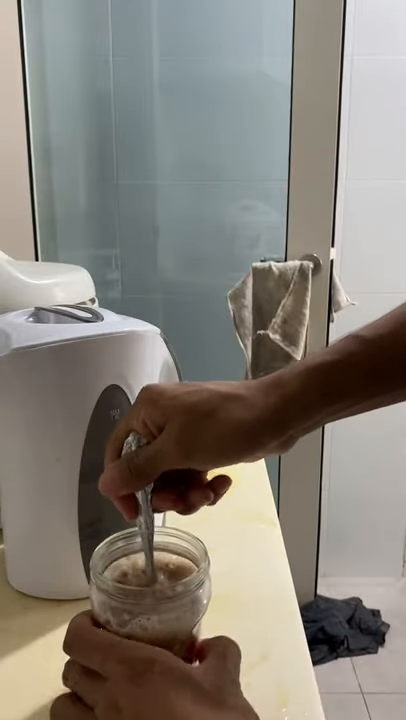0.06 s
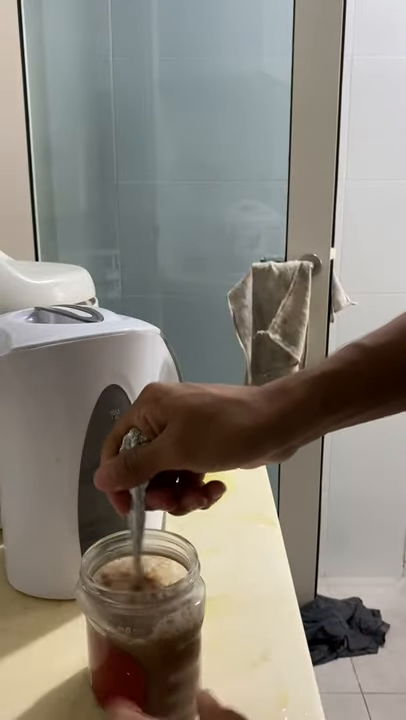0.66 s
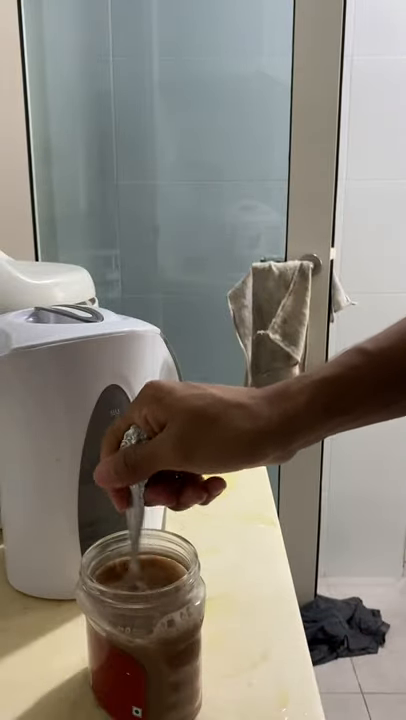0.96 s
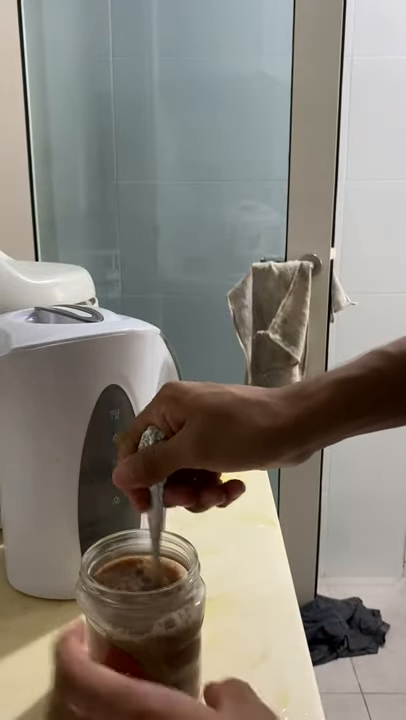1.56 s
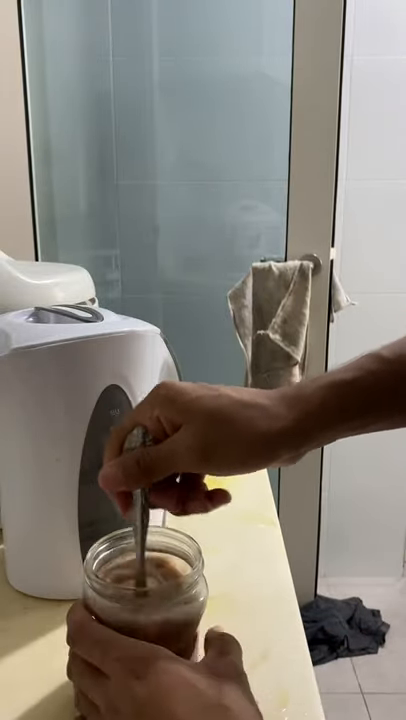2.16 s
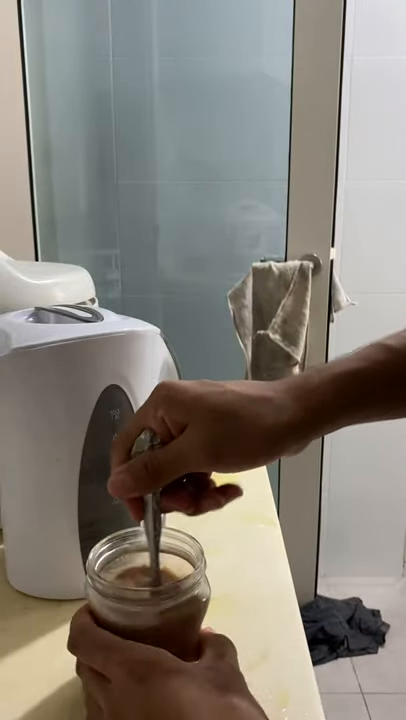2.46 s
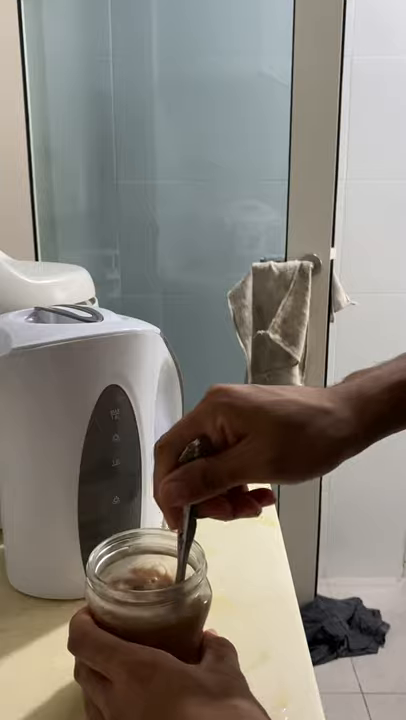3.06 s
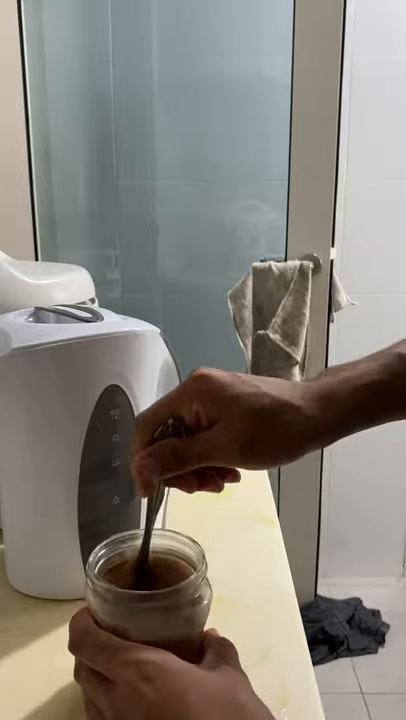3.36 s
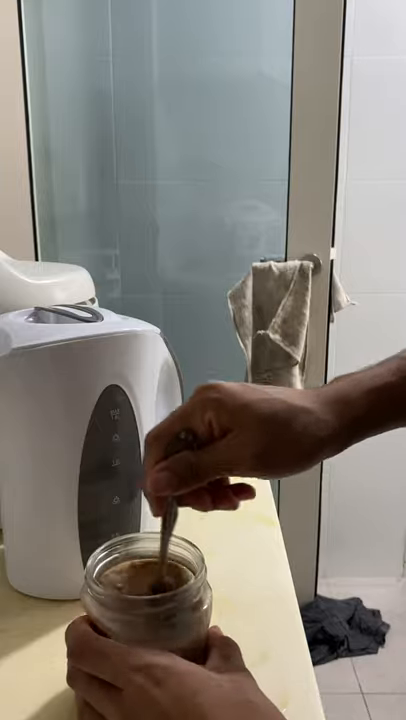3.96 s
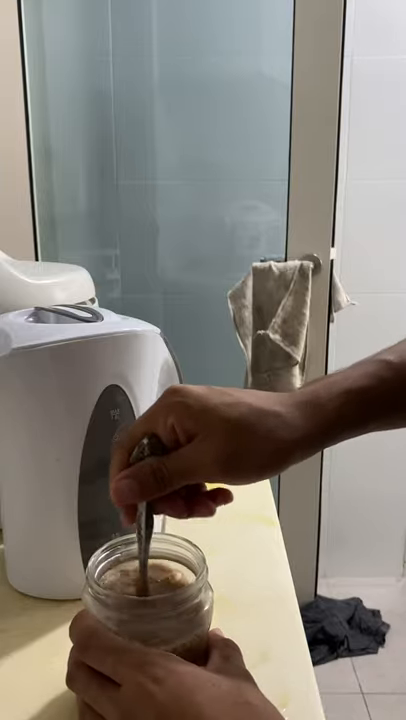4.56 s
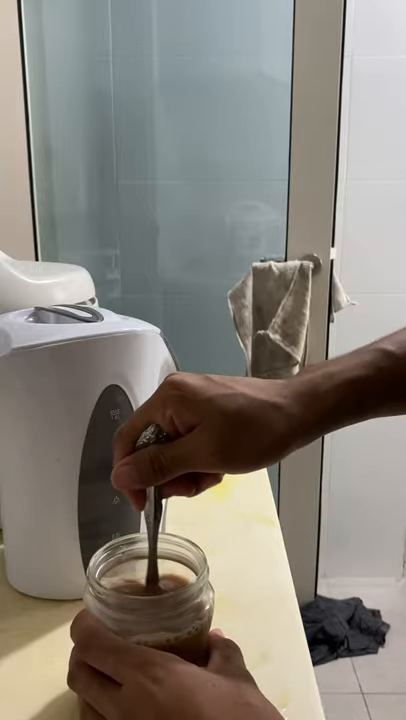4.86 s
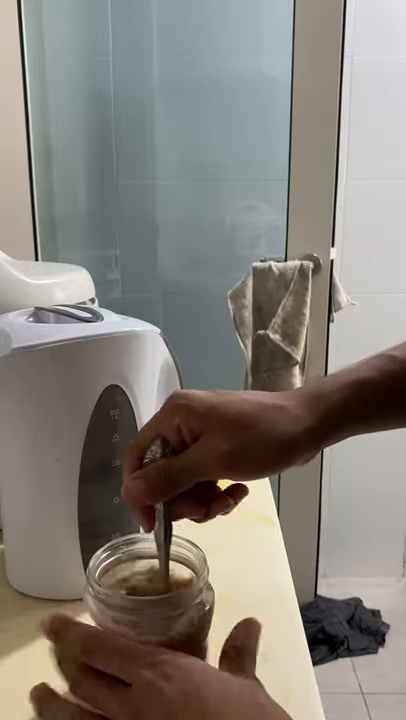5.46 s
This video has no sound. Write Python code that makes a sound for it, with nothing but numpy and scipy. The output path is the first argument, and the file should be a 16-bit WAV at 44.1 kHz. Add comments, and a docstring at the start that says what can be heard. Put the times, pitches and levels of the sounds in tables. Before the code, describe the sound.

A steel spoon stirs a thick drink in a glass jar, close by, for about five and a half seconds. From the start it clinks against the glass several times a second, unevenly, each hit bright and quickly damped. Duller knocks with small wet plops fall among the clinks, and the liquid swishes softly with a few tiny bubbles. The jar rubs faintly on the counter in the first 0.3 seconds and again near 1.9, with light low thumps mostly between 1 and 2.5 seconds. The loudest clinks come from 2 to 2.5 seconds. After that the hits are somewhat lighter and sparser. From about 4.2 to 4.8 seconds the spoon drags over the bottom with a faint hollow tone, and sharper clinks stand out near 4.5 and 5 seconds. A small tiled kitchen gives a short echo, with a low steady hum underneath.

```python
"""Stirring a thick drink in a jar

A steel spoon stirs inside a glass jar that a hand steadies on a kitchen counter. Each knock thuds
into the counter, sounds the air in the jar and briefly rings the damped glass and the spoon.
Deep knocks plop, and the drink swishes softly in between; a small tiled room answers, over a low hum."""
import sys
import numpy as np
from scipy import signal
from scipy.fft import rfft, irfft
from scipy.io import wavfile
from scipy.ndimage import uniform_filter1d

SR = 44100
rng = np.random.default_rng(int(sys.argv[2]) if len(sys.argv) > 2 else 0)


def unload_audio(sound):
    """Save the sound as a 16-bit wav file, at the path given as the first command line argument."""
    columns = np.transpose(np.atleast_2d(sound))
    # keep every value between -1 and 1, then stretch to whole-number steps
    steps = np.round(np.clip(columns, -1, 1) * 32767)
    wavfile.write(sys.argv[1], SR, steps.astype(np.int16))


N = 243431
TIME = np.arange(N) / SR
RING = np.arange(SR * 3 // 10) / SR  # time axis of one hit, t/s


def amp(db):
    """Decibels to gain."""
    return 10 ** (np.asarray(db) / 20)


def unit_rms(x):
    """Normalises to rms 1."""
    return x / np.sqrt(np.mean(x ** 2) + 1e-20)


def unit_attack(x):
    """Normalises to rms 1 over the attack."""
    return x / np.sqrt(np.mean(x[:SR // 54] ** 2) + 1e-20)


def curve_at(points, hz):
    """Reads a curve on a log frequency axis."""
    f, value = np.transpose(points)
    return np.interp(np.log(hz + 1), np.log(f + 1), value)


def eq(x, points):
    """Shapes x with a curve of f/Hz, level/dB."""
    hz = np.fft.rfftfreq(x.shape[-1], 1 / SR)
    return irfft(rfft(x) * amp(curve_at(points, hz)), x.shape[-1])


def add(mix, s, sound):
    """Mixes a sound in at s seconds."""
    part = mix[max(round(s * SR), 0):][:len(sound)]
    part += sound[:len(part)]


def decay(t60):
    """Falls 60 dB in t60 seconds."""
    return np.exp(-np.log(1000) * RING / max(t60, 1e-3))


def rise(seconds):
    """Softens an onset."""
    return 1 - np.exp(-RING / seconds)


def modal(modes, spot_db=1.5, detune=0.013):
    """A struck part: the contact spot sets each mode's strength; the sloshing drink detunes it."""
    sound = np.zeros(len(RING))
    for (hz, db, t60), (spot, shift, side) in zip(modes, rng.standard_normal((len(modes), 3))):
        tone = np.sin(2 * np.pi * hz * (1 + detune * shift) * RING)
        sound += np.sign(side) * amp(db + spot_db * spot) * decay(t60) * tone
    return unit_attack(sound)


# Low modes of the thud, a room boom near 120 Hz and the woody counter: f/Hz, level/dB, t60/s
THUD_MODES = [(122, -9.5, 0.2), (173, -14, 0.099), (247, -16, 0.11), (331.6, -4.5, 0.19),
              (396, -12.5, 0.022)]
# Judders of the jar's foot: t/s, length/s, level/dB, slip rate/Hz, unevenness
JUDDERS = [(0.0, 0.19, -54.5, 205, 0.3), (0.159, 0.12, -53, 207, 0.36), (0.289, 0.043, -47.5, 210, 0.54),
           (1.897, 0.083, -42.5, 335, 0.02)]
def judders(low_cut_hz=170):
    """The glass foot sticks and slips; every slip thumps the counter, damped by the pressing hand."""
    out = np.zeros(N)
    low_cut = signal.butter(2, low_cut_hz, "high", fs=SR, output="sos")
    for s, length, db, rate_hz, uneven in JUDDERS:
        n = round(length * SR)
        wander = unit_rms(uniform_filter1d(rng.standard_normal(n), size=200))
        slip_count = np.floor(np.cumsum(rate_hz * np.exp(uneven * wander)) / SR)
        slips = np.diff(slip_count, prepend=0)
        rub = signal.fftconvolve(slips, modal(THUD_MODES) * decay(0.012))[:n]
        fade = signal.windows.tukey(n, .3) * np.linspace(1, .4, n)
        add(out, s, amp(db) * unit_rms(signal.sosfilt(low_cut, rub) * fade))
    return out


# Fader ride of the swish, before its trim: t/s, level/dB
SWIRL_RIDE = [(0, -41.5), (.3, -61), (0.801, -58.5), (0.999, -57), (1.2, -65.5), (1.601, -59), (2.2, -58.5),
              (2.65, -61.5), (3.5, -72), (3.65, -59.5), (3.85, -69.5), (4.2, -65.5), (4.95, -67.5),
              (5.2, -58.5), (5.52, -70)]
# Its hollow tone: f/Hz, level/dB
SWIRL_EQ = [(250, -25), (480, -6.5), (590, 0), (660, -13.5), (730, 2.5), (830, -29), (1000, -16.5),
            (1500, -18.5), (3200, -16.5), (6500, -27.5), (9000, -76)]
def swirl(trim_db=-2, lumpy_db=3):
    """The drink swishes round in uneven lumps, coloured by the air in the jar."""
    lumps = unit_rms(eq(rng.standard_normal(N), [(1, 0), (30, 0), (90, -60), (200, -120)]))
    swish = unit_rms(eq(rng.standard_normal(N) * amp(lumpy_db * lumps), SWIRL_EQ))
    return swish * amp(np.interp(TIME, *np.transpose(SWIRL_RIDE)) + trim_db)


# Stereo image of the room: f/Hz, left-right correlation
ROOM_IMAGE = [(60, 1), (130, 0.98), (300, 0.94), (2000, 0.88), (3600, 0.2), (5000, 0.45), (7000, 0.8),
              (8200, 0.97), (10000, 0.99), (11500, 0.97), (13000, 0.85), (14500, 0.5)]
def room_noise(n):
    """Stereo noise, partly alike in left and right."""
    left, other = rng.standard_normal((2, n))
    same = curve_at(ROOM_IMAGE, np.fft.rfftfreq(n, 1 / SR))
    right = irfft(same * rfft(left) + np.sqrt(1 - same ** 2) * rfft(other), n)
    return np.array([left, right])


# Room tone: f/Hz, relative level/dB
HUM_EQ = [(12, -28.5), (25, -11), (49, -2.5), (68, 7), (111, -6), (180, -9), (330, -13), (480, -14),
          (656, -8.5), (850, -23.5), (1400, -21.5), (3200, -40.5), (6500, -46), (8500, -53), (13000, -51),
          (15000, -58)]
def hum(level_db=-56.5):
    """The low, steady background of the kitchen."""
    return amp(level_db) * unit_rms(eq(room_noise(N), HUM_EQ))


def ring(modes, clatter, rise_s, linger=1, note_hz=0, share=0, note_t60=.05):
    """One part's modes and dense clatter, with a share of the energy in the note the blow favours."""
    low_hz, high_hz, clatter_db, clatter_t60 = clatter
    band = signal.butter(5, [low_hz, high_hz], "band", fs=SR, output="sos")
    dense = signal.sosfilt(band, rng.standard_normal(len(RING)) * decay(clatter_t60 * linger))
    note = unit_attack(np.sin(2 * np.pi * note_hz * RING) * decay(note_t60))
    body = modal(modes) + amp(clatter_db) * unit_attack(dense)
    body = unit_attack(body - note * (body @ note) / (note @ note + 1e-20))  # make room for the note
    share = np.clip(share, 0, 1)
    return unit_attack((np.sqrt(1 - share) * body + np.sqrt(share) * note) * rise(rise_s))


# Modes of the jar's air, glass wall, spoon, spoon edge and a very high ting: f/Hz, level/dB, t60/s
AIR_MODES = [(579.6, -2.5, 0.044), (688, 2, 0.025), (736.5, -5, 0.056)]
WALL_MODES = [(1158, 1.5, 0.04), (1284, -2.5, 0.066), (1439, 0.5, 0.063), (1490, 0.5, 0.06),
              (1580, 0, 0.035), (1681, 0.5, 0.029), (1846, -0.5, 0.029), (2044, 8.5, 0.023),
              (2210, 3.5, 0.023), (2330, 0, 0.027)]
SPOON_MODES = [(2920, -1.6, 0.048), (3060, -2, 0.04), (3245, -0.65, 0.055), (3412, 0.8, 0.037),
               (3713, -1, 0.03), (3865, -0.77, 0.03)]
EDGE_MODES = [(4810, 2.5, 0.033), (5216, 0.5, 0.026), (5507, 3, 0.023), (5677, -0.5, 0.04),
              (6370, -5, 0.02), (7120, -8, 0.022)]
TING_MODES = [(11500, 6.5, 0.02), (13400, -2, .025), (13500, 1, .025), (14900, -4, .018)]
# Noisy clatter beside the modes: low f/Hz, high f/Hz, level/dB against the modes, base t60/s
THUD_CLATTER = (241, 503, -3, 0.1261)
AIR_CLATTER = (478.5, 773, -7.5, 0.0643)
WALL_CLATTER = (1206, 2395, 1.5, 0.1055)
SPOON_CLATTER = (2403.5, 4301.5, 2, 0.0779)
EDGE_CLATTER = (4720, 7800, 0.8, 0.021)
TING_CLATTER = (11500, 15000, 7, .012)
# The crisp tick of bare steel on glass: f/Hz, level/dB
TICK_EQ = [(4000, -26), (6500, -6), (8000, 3), (9600, 5), (11000, 2), (12500, -2), (14000, -7),
           (15300, -11), (16300, -34)]
def knock(levels_db, tick_db, wall_hz, wall_share, spoon_share, linger, spoon_hz=3124, edge_hz=3300):
    """A knock sounds thud, air, wall, spoon and edge at once, each as hard as the blow reaches it."""
    wall_t60 = 0.034 * (1490 / wall_hz) ** 1.8  # higher notes die sooner
    thud = ring(THUD_MODES, THUD_CLATTER, rise_s=0.0011)
    air = ring(AIR_MODES, AIR_CLATTER, rise_s=0.00091)
    wall = ring(WALL_MODES, WALL_CLATTER, 0.00059, linger, wall_hz, wall_share, wall_t60)
    spoon = ring(SPOON_MODES, SPOON_CLATTER, 0.0017, linger, spoon_hz, spoon_share, note_t60=0.013)
    edge = ring(EDGE_MODES, EDGE_CLATTER, 0.00027, linger, edge_hz, share=0.38, note_t60=0.0074)
    crack = unit_attack(eq(rng.standard_normal(len(RING)) * decay(.007), TICK_EQ) * decay(.3))
    ting = ring(TING_MODES, TING_CLATTER, rise_s=0.00016)
    trims_db = np.array([-1, 0, 1.26, -0.24, -1])
    body = amp(levels_db + trims_db) @ np.array([thud, air, wall, spoon, edge])
    return body + amp(tick_db - 3.5) * crack + amp(tick_db - 10) * ting


# Bright hits, before trims: t/s, wall level/dB; thud, spoon, edge level/dB against the wall;
# tick level/dB; wall, spoon, edge note f/Hz; wall note share, spoon note weight
CLINKS = [(0.002, -45.5, -10, 4, 7, -50, 2290, 3120, 5580, 0.95, 0.13),
          (0.0682, -32, -11.5, -0.5, -5, -43.5, 1603, 3210, 5360, 0.7, 0.48),
          (0.1327, -33.5, -5, 2.5, 7, -34.5, 2225, 3250, 5700, 0.52, 0.22),
          (0.369, -55.5, 10, -5, -4.5, -63, 1665, 3730, 4660, 0.46, 0.31),
          (0.4934, -37.5, -2, 2.5, 4, -37, 1276, 3420, 5850, 0.52, 0.38),
          (0.6865, -36, -4, -1, 2.5, -31, 1434, 3020, 5590, 0.29, 0.2),
          (0.884, -40, 3, 5.5, 0, -58, 1625, 3550, 4880, 0.32, 0.42),
          (1.0358, -45.5, -6, -9, -7, -56.5, 1555, 3800, 5520, 0.71, 0.2),
          (1.1453, -59.5, -6, 1, 4, -66, 1490, 3400, 4855, 0.24, 0.33),
          (1.286, -33, -8, -7, -10, -44, 1987, 3280, 5600, 0.79, 0.2),
          (1.4037, -41, -7, -5, -0.5, -45, 1250, 3460, 5530, 0.66, 0.56),
          (1.469, -37.5, -9, -5, -8.5, -52, 2030, 3050, 5900, 0.92, 0.17),
          (1.558, -52, -11, 5, -0.5, -68, 2000, 3176, 4844, 0.44, 0.3),
          (1.5783, -33.5, -7.5, -8.5, -6, -48.5, 1552, 3450, 4700, 0.64, 0.5),
          (1.6391, -36.5, -7, 0.5, -9.5, -51, 1970, 3140, 4470, 0.27, 0.59),
          (1.782, -32.5, -11, -7, -9, -41.5, 1650, 3090, 5200, 0.48, 0.32),
          (1.9234, -50.5, 0, 1, 4, -62, 2280, 3080, 5470, 0.29, 0.45),
          (2.0029, -25, -15, -4.5, -8.5, -38.5, 1486, 3720, 5600, 0.62, 0.15),
          (2.0289, -34, -3.5, -14, -8.5, -61, 1616, 3910, 5540, 0.52, 0.17),
          (2.1462, -45.5, -12, -12, -18, -80, 1830, 3100, 5600, 0.61, 0.31),
          (2.1815, -57.5, 6, 2.5, -7, -83, 1570, 3110, 5280, 0.67, 0.78),
          (2.3065, -29, -15.5, -10.5, -10, -44.5, 1552, 3430, 4720, 0.51, 0.43),
          (2.495, -27.5, -14, -4.5, -3, -35.5, 1514, 3740, 5500, 0.72, 0.55),
          (2.7691, -53, -10, 5, -1.5, -71, 1546, 4240, 4800, 0.87, 0.51),
          (2.9652, -40, -15.5, 7, -0.5, -50.5, 2000, 4130, 4866, 0.41, 0.14),
          (2.983, -42.5, -15, 0, 3, -66, 2340, 3500, 5430, 0.95, 0.23),
          (3.2551, -56, -6, 7, -22, -63, 2060, 3030, 6790, 1, 0.78),
          (3.295, -44, -13, -11.5, -24, -83, 1617, 3060, 5810, 0.95, 0.25),
          (3.3467, -38, -15, -10.5, -12, -53, 1630, 3700, 5470, 0.63, 0.1),
          (3.3785, -38, -3.5, -8.5, -11, -55, 2040, 2480, 5630, 0.68, 0.29),
          (3.6672, -41.5, -16, 4, -1.5, -59, 2030, 3440, 4970, 0.71, 0.43),
          (3.741, -56.5, -11.5, -4.5, 0, -86, 2050, 3300, 5700, 0.22, 0.51),
          (3.925, -75, -4.5, 10, -5, -87, 2300, 3720, 4850, 0.85, 0.83),
          (3.959, -43.5, -5, -5, -19, -67, 2070, 4000, 4400, 0.32, 0.25),
          (4, -59, -7, -16, -21, -81, 2070, 2950, 4870, 0.2, 0.19),
          (4.124, -37.5, -10.5, -2, -16, -53, 1490, 3650, 5300, 0.66, 0.71),
          (4.134, -48, -13, 5.5, -12, -71, 1540, 3760, 5400, 0.13, 0.94),
          (4.347, -66.5, -14, 11.5, 2, -64, 2020, 3840, 4640, 0.26, 0.75),
          (4.4461, -56.5, -9, 8, 5.5, -70.5, 1540, 3270, 5240, 0.35, 0.34),
          (4.454, -34, -5, 3.5, 6, -37.5, 1534, 3170, 5230, 0.57, 0.6),
          (4.757, -48, -8, -3.5, -10, -61, 1644, 3650, 5440, 0.95, 0.64),
          (5.0103, -31, -6.5, 5, 4.5, -31.5, 2040, 2970, 5706, 0.77, 0.45),
          (5.081, -42, -29.5, 2.5, 3, -45.5, 2060, 2980, 5560, 0.41, 0.31),
          (5.295, -41, -16, -3, -9.5, -59, 1514, 3190, 5300, 0.76, 0.56)]
def clinks():
    """Steel on the glass wall: the contact spot picks one note each from wall, spoon and edge."""
    out = np.zeros(N)
    for s, wall, thud, spoon, edge, tick, wall_hz, spoon_hz, edge_hz, share, weight in CLINKS:
        air = -2 + 0.66 * thud  # stirred partly by the wall, partly by the thud
        levels_db = wall + np.array([thud, air, 0, spoon, edge])
        linger = 0.63 * amp(0.25 * spoon)  # a rattling spoon clatters longer
        blow = knock(levels_db, tick, wall_hz, share, 1.235 * weight, linger, spoon_hz, edge_hz)
        add(out, s - .0005, blow)
    return out


# Low thumps, before balance and trims: t/s, level/dB
THUMPS = [(.287, -39.5), (1.08, -42.5), (1.8505, -37), (1.8987, -43), (2.0946, -42), (2.1623, -45),
          (2.506, -44), (5.019, -49)]
def thumps():
    """The jar rocks and its foot thumps the counter."""
    out = np.zeros(N)
    balance_db = np.array([0.7, -3.5, -18, -34, -46.5])  # thud, air, wall, spoon, edge
    for s, db in THUMPS:
        blow = knock(db + balance_db, -np.inf, wall_hz=1434, wall_share=.5, spoon_share=.3, linger=1)
        add(out, s - .0005, blow)
    return out


def plop(pitch_hz=780, spread=0.045, sag=0.3, glide_s=0.008):
    """A pocket of air behind the spoon rings and glides up as the drink closes over it."""
    hz = pitch_hz * np.exp(spread * rng.standard_normal()) * (1 - sag * np.exp(-RING / glide_s))
    return unit_attack(np.sin(2 * np.pi * np.cumsum(hz) / SR) * decay(0.036) * rise(0.0016))


# Dull, wet hits, before balance and trims: t/s, level/dB, wall note f/Hz
HOLLOW_KNOCKS = [(.547, -48, 1260), (.7415, -39.5, 1440), (0.9374, -36.5, 1520), (1.1464, -51.5, 1474),
                 (1.34, -32.5, 1990), (1.558, -34.5, 2060), (1.782, -35.5, 1594), (2.0022, -25, 1425),
                 (2.0952, -32.5, 1900), (2.593, -34, 1283), (3.534, -32.5, 1710), (3.739, -52.5, 2120),
                 (4.4989, -40, 1596), (5.077, -38.5, 1650), (5.295, -41, 1470), (5.4417, -45.5, 1450)]
def hollow_knocks():
    """The spoon knocks deep in the drink, each time with a plop."""
    out = np.zeros(N)
    balance_db = np.array([-14.5, -9, -8, -13, -18.5])  # thud, air, wall, spoon, edge
    for s, db, wall_hz in HOLLOW_KNOCKS:
        blow = knock(db + balance_db, db - 25, wall_hz, wall_share=.4, spoon_share=.25, linger=0.33)
        add(out, s - .0005, blow + amp(db + 1.5) * plop())
    return out


# Tiny blips in the froth: t/s, level/dB, starting f/Hz
BUBBLES = [(0.661, -53.5, 1710), (0.772, -56, 1900), (1.2575, -52, 1940), (2.457, -53.5, 1570),
           (3.151, -63, 1670), (4.1035, -58, 1870), (4.8984, -70, 2000)]
def bubbles(t60=0.014, glide_per_s=1.5):
    """Each bursting bubble rings for a moment and rises in pitch as it opens."""
    out = np.zeros(N)
    for s, db, hz in BUBBLES:
        cycles = hz * (RING + glide_per_s * RING ** 2 / 2)
        add(out, s, amp(db) * unit_attack(np.sin(2 * np.pi * cycles) * decay(t60) * rise(0.0026)))
    return out


# Sparkle on top: t/s, level/dB, centre f/Hz
SIZZLES = [(.687, -43, 12050), (2.496, -60, 15200), (2.966, -62, 13800)]
def sizzles(t60=0.14, width_hz=700):
    """A narrow band of very high hiss sizzles briefly after three hits."""
    out = np.zeros(N)
    for s, db, hz in SIZZLES:
        band = signal.butter(2, [hz - width_hz / 2, hz + width_hz / 2], "band", fs=SR, output="sos")
        hiss = signal.sosfilt(band, rng.standard_normal(len(RING)))
        add(out, s, amp(db) * unit_attack(hiss * decay(t60)))
    return out


# Short, soft moans: t/s, length/s, level/dB, f/Hz
DRAGS = [(4.158, 0.17, -55.5, 683), (4.301, 0.13, -59.5, 707), (4.531, 0.17, -53, 658),
         (4.699, 0.15, -59, 657)]
def drags(width_hz=30):
    """The spoon drags over the bottom; its friction feeds one narrow resonance of the jar's air."""
    out = np.zeros(N)
    for s, length, db, hz in DRAGS:
        n = round(length * SR)
        resonance = np.sin(2 * np.pi * hz * RING) * RING * np.exp(-2 * np.pi * width_hz * RING)
        moan = signal.fftconvolve(rng.standard_normal(n + len(RING) - 1), resonance, "valid")
        add(out, s, amp(db) * unit_rms(moan * signal.windows.tukey(n, .6)))
    return out


def crossfades(rate_hz):
    """Two gains that trade places at constant power."""
    angle = 2 * np.pi * rate_hz * TIME
    return np.cos(angle), np.sin(angle)


# Stereo image of the close sound: f/Hz, left-right correlation
CLOSE_IMAGE = [(600, 1), (2200, 0.97), (3600, 0.5), (4800, 0.72), (7000, 0.92), (9500, 0.995),
               (11500, 0.96), (15000, 0.8)]
def close_scatter(x, length_s=0.0034):
    """Hands and counter scatter the direct sound differently to each side; the image slowly shifts."""
    n = round(length_s * SR)
    scattered = np.zeros(N)
    for gain in crossfades(rate_hz=1.303):
        taps = unit_rms(rng.standard_normal(len(RING))[:n]) / np.sqrt(n)
        scattered += signal.oaconvolve(x * gain, taps)[:N]
    same = curve_at(CLOSE_IMAGE, np.fft.rfftfreq(N, 1 / SR))
    mid = irfft(rfft(x) * np.sqrt((1 + same) / 2), N)
    side = irfft(rfft(scattered) * np.sqrt((1 - same) / 2), N)
    return np.array([mid + side, mid - side])


# Reverb time: f/Hz, t60/s
ROOM_T60 = [(100, 0.83), (300, 0.48), (650, 0.38), (1500, 0.35), (3500, 0.36), (6500, 0.43), (9000, 0.37),
            (14000, 0.28)]
# Reverb tone: f/Hz, level/dB
ROOM_EQ = [(100, 5.5), (300, -5), (650, -0.5), (1500, -3.5), (2200, -5), (3300, -3), (6800, -6), (9000, -6),
           (12500, -8.5), (15000, -20)]
def room_tail(predelay_s=.005, early_s=0.018):
    """Dense reflections off the tiles; the nearest surfaces answer first and loudest."""
    t = np.arange(SR * 3 // 4) / SR
    taps = room_noise(len(t)) * (1 + np.exp(-t / early_s)) / 1.5
    hz, frame_s, bands = signal.stft(taps, SR, nperseg=256)
    rate = np.log(1000) / curve_at(ROOM_T60, hz)[:, None]
    fade = np.exp(-rate * frame_s) * np.sqrt(2 * rate / SR)  # unit energy in every band
    tail = signal.istft(bands * fade * amp(curve_at(ROOM_EQ, hz))[:, None], SR, nperseg=256)[1]
    return np.pad(tail, ((0, 0), (round(predelay_s * SR), 0)))


def room(x):
    """Two room tails crossfade slowly, so the reverb's colour varies from hit to hit."""
    return sum(signal.fftconvolve((x * gain)[None], room_tail(), axes=1)[:, :N]
               for gain in crossfades(rate_hz=0.9074))


def scene(deep_send_db=-3):
    """Jar and spoon close by, the room around them; blows deep in the jar reach the room less."""
    deep = hollow_knocks() + thumps()
    bright = clinks() + sizzles() + judders() + drags() + swirl() + bubbles()
    return close_scatter(bright + deep) + room(bright + amp(deep_send_db) * deep) + hum()


# Left against right: f/Hz, level/dB
STEREO_BALANCE = [(50, 0), (110, -.5), (200, -1.5), (380, -3.8), (700, -1), (1290, 0), (2380, -.6),
                  (4400, -.8), (8000, 0)]
# Left ahead of right: f/Hz, phase/rad
STEREO_PHASE = [(0, 0), (400, 0), (600, .5), (860, .7), (1120, .15), (1750, .2), (2400, .65), (2840, 1.2),
                (3450, .4), (3900, 1.6), (4400, 1.4), (5100, 2.1), (6100, 1.9), (7750, 3.1), (11300, 3.2),
                (13400, 3.9), (15300, 5.5)]
def record(dry, high_cut_hz=16200):
    """Left and right hear the jar a little apart; a steep high cut takes off the very top."""
    hz = np.fft.rfftfreq(N + SR, 1 / SR)
    half = amp(curve_at(STEREO_BALANCE, hz) / 2) * np.exp(1j * curve_at(STEREO_PHASE, hz) / 2)
    stereo = irfft(rfft(dry, N + SR) * np.array([half, 1 / half]), N + SR)[:, :N]
    high_cut = signal.firwin(511, high_cut_hz, window=("kaiser", 9), fs=SR)
    return signal.oaconvolve(stereo, high_cut[None], "same")


dry = scene()
out = record(dry)
unload_audio(out)
```